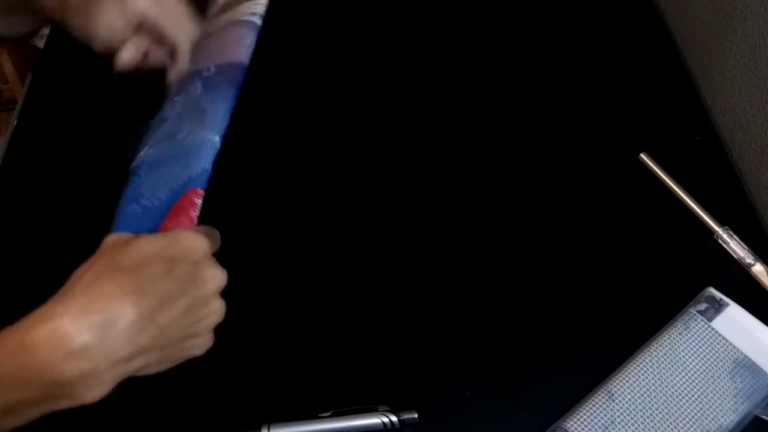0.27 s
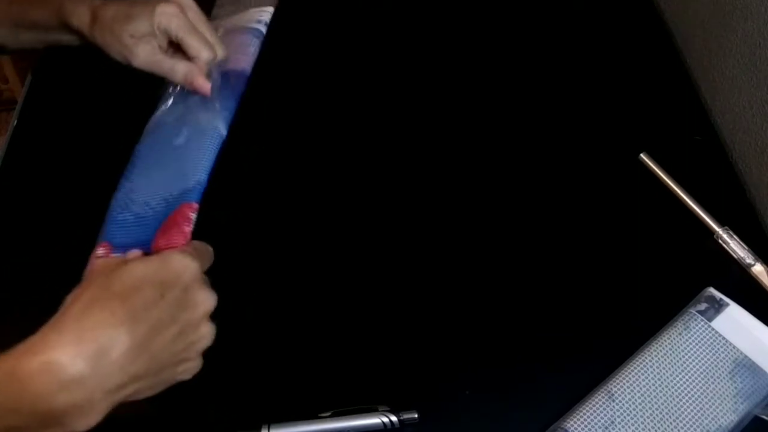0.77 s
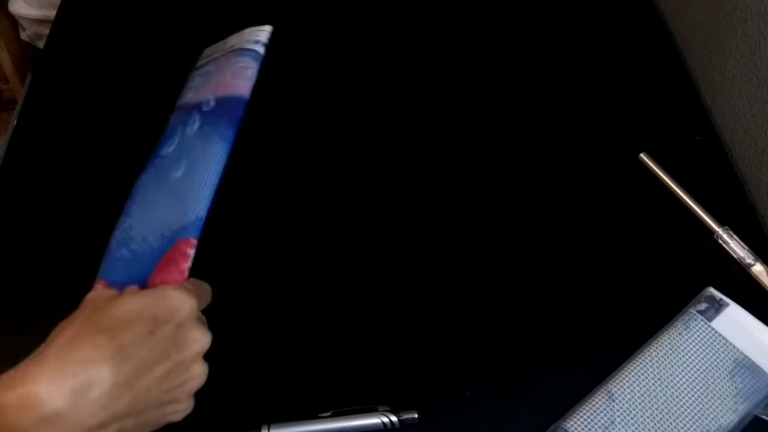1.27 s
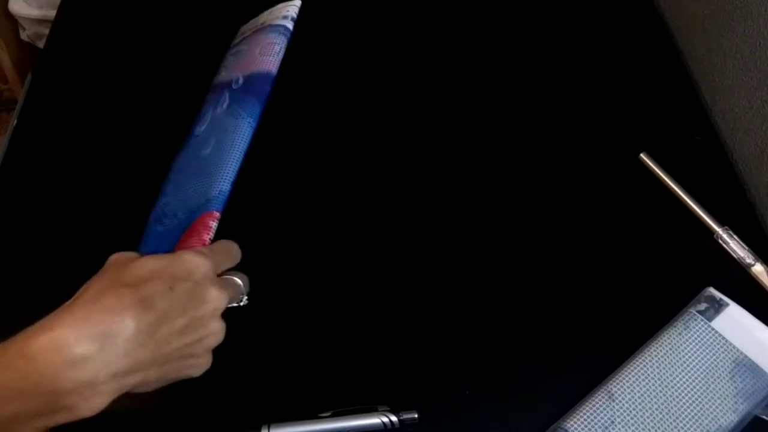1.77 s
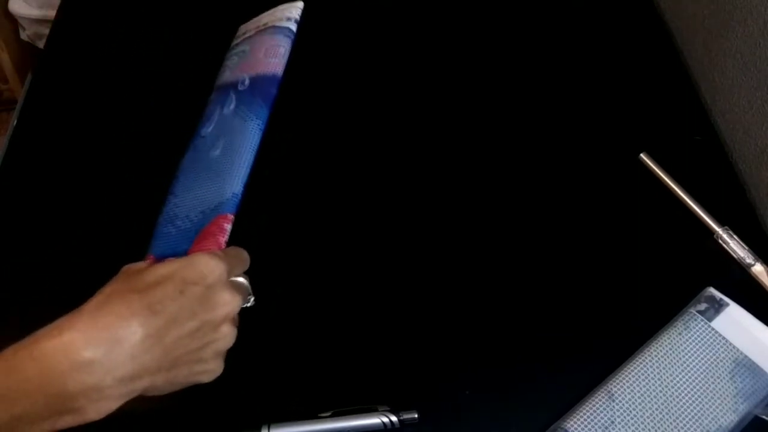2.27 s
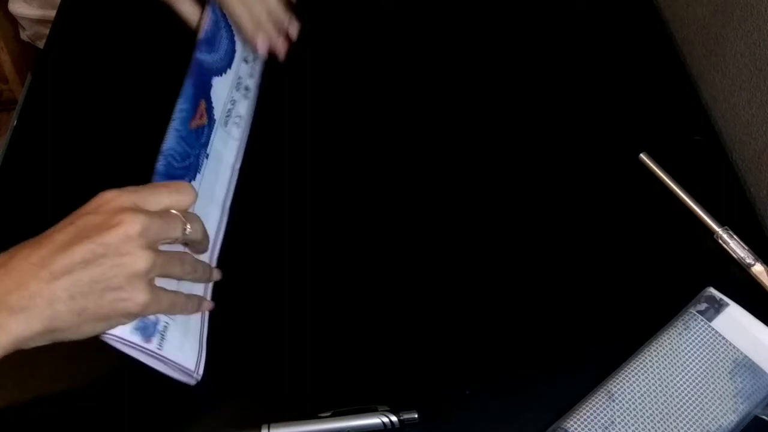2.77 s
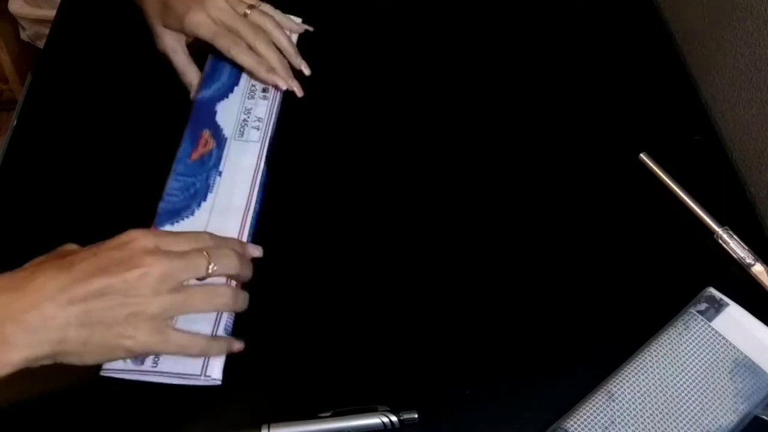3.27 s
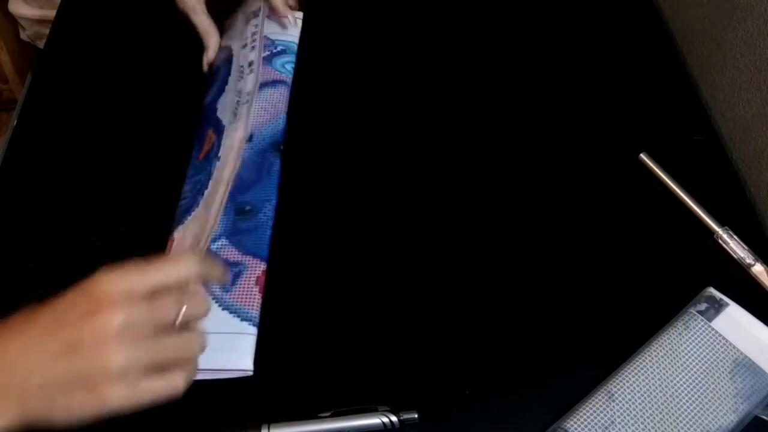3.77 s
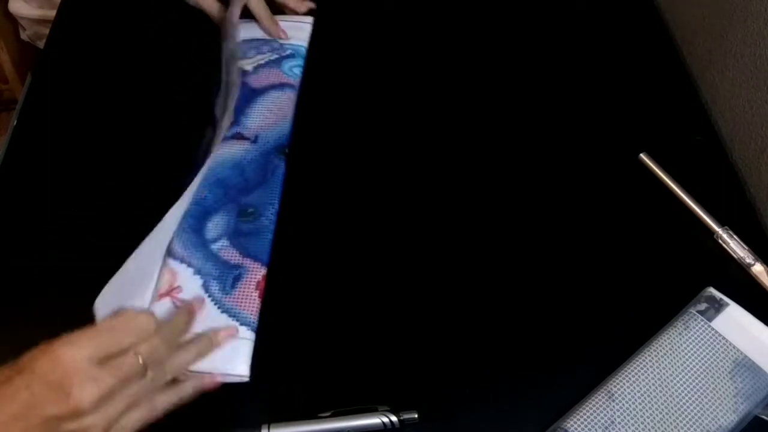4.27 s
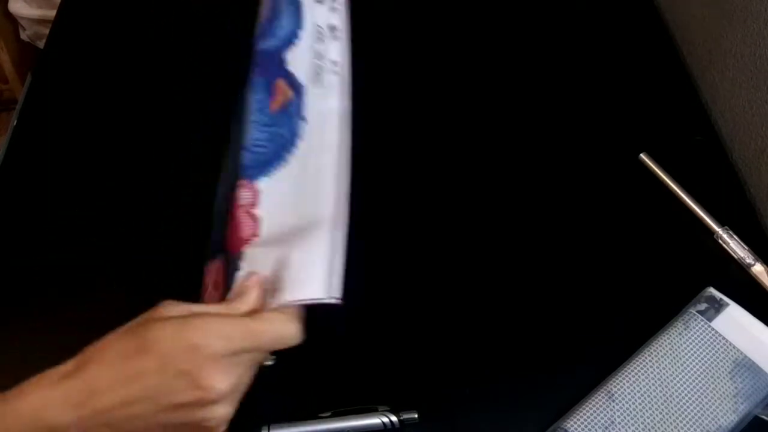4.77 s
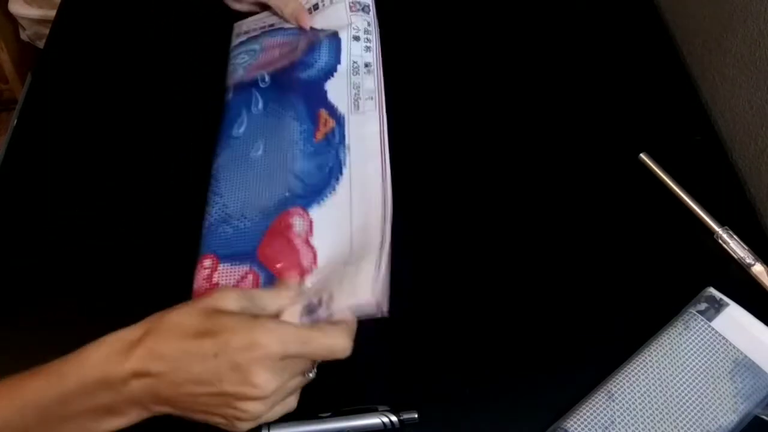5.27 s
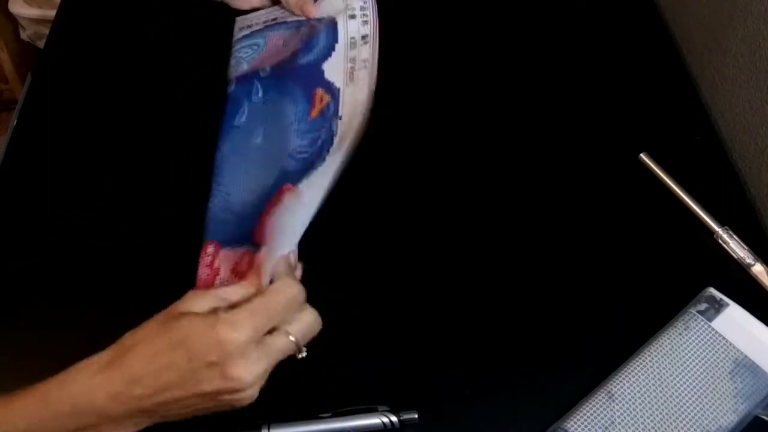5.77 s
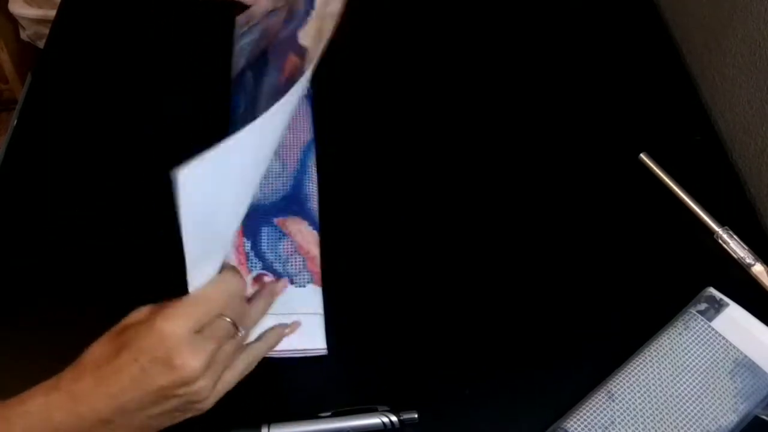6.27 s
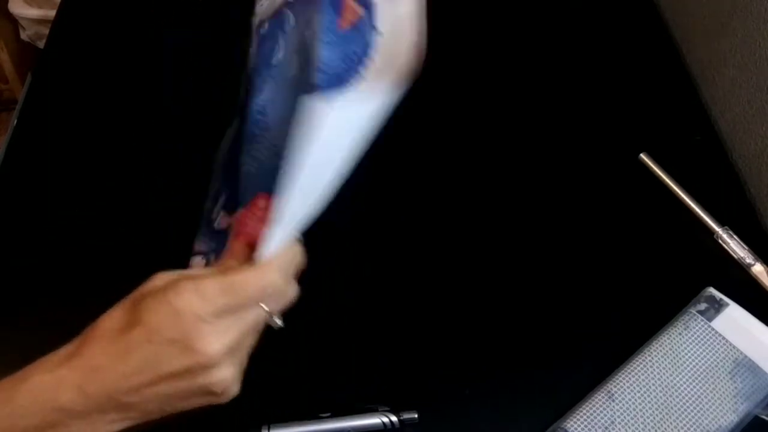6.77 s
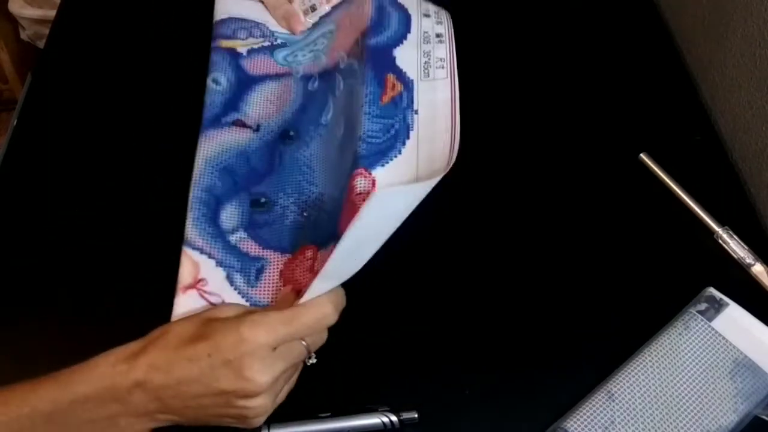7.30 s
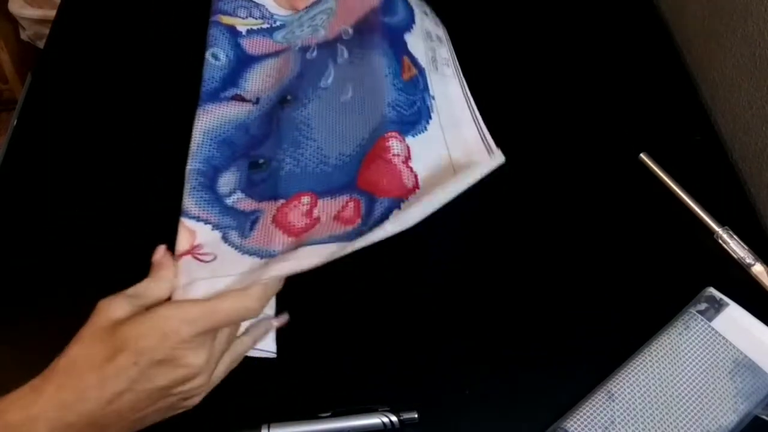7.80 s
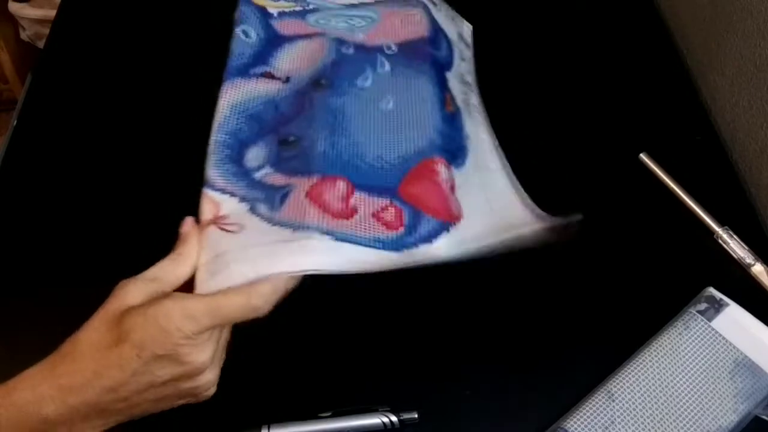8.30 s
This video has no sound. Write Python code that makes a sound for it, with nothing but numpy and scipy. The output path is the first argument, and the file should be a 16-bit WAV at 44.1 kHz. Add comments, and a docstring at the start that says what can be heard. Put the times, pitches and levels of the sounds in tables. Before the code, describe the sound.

Close stereo microphones in a small quiet room catch hands handling a tightly rolled coated canvas on a wooden desk. Sparse film crackles and small snaps come first, then a quieter stretch. A hard slap and desk knock just past four seconds begins the unrolling, with brighter clicks, flapping rustles, several bumps around six seconds, a sharp slap at seven, and a growing crinkle to the end.

```python
"""A soft slap and a faint rustle open a run of crackles, snaps and knocks over quiet room tone:
hands unroll a stiff coated canvas on a wooden desk in a small room, close to two microphones.
Film, sheet and fingertips are noise driven by random slips; creases snap, and blows ring the desk's modes.
The hollow roll hums on one note when bumped or dragged. The left microphone is duller, inverted,
a little late and carries an offset."""
import sys
import numpy as np
from scipy import signal
from scipy.fft import rfft, irfft, next_fast_len
from scipy.io import wavfile

SR = 44100
rng = np.random.default_rng(int(sys.argv[2]) if len(sys.argv) > 2 else 0)


def transcribe(u):
    """Save the signal u as a 16-bit wav file named by the first command-line argument.

    u: samples, shape (n,) or (channels, n), limited to [-1, 1]; the rate is SR.
    q: integer samples, one column per channel.
    """
    v = np.clip(np.atleast_2d(u).T, -1, 1)
    q = np.round(v * 32767).astype(np.int16)
    wavfile.write(sys.argv[1], SR, q)


N = 376613  # length in samples

# Room tone spectrum. Each row: frequency in Hz, density in dB per Hz.
ROOM_TONE = [(30, -94), (75, -83), (150, -82.5), (350, -90), (1200, -101.5), (3000, -104), (7000, -114),
             (15000, -115)]
# Reverberation. Each row: band centre in Hz, time to fall 60 dB in seconds.
ROOM_DECAY = [(300, 0.25), (1500, 0.12), (8000, 0.24)]
# Bumps and drags of the hollow roll. Each row: start in seconds, peak in dB, contact decay in seconds.
ROLL_BUMPS = [(3.389, -42.5, 0.021), (3.872, -52.5, 0.017), (3.956, -49.5, 0.11), (4.15, -47, 0.037),
              (7.024, -43, .01)]
# Modes of the desk top. Each row: frequency in Hz, relative level in dB, time to fall 60 dB in seconds.
DESK_MODES = [(82.6, -26.5, 0.66), (139.7, 0, 0.27), (203, -11.5, 0.2), (269.4, -15, 0.19),
              (442, -1, 0.025), (644.5, -17, 0.076)]
# Sheet slaps and bumps of the roll. Each row: start in seconds, slap peak in dB, slap centre in Hz,
# desk peak in dB, hardness in dB per octave, contact time in seconds.
CONTACTS = [(.027, -40, 617, -63, 14, 0.017), (0.3403, -32, 624, -73, -11, 0.015),
            (1.254, -40, 284, -41.5, -6, 0.024), (2.217, -40, 274, -62, 18, 0.017),
            (3.3885, -40, 318, -34, 1, 0.0099), (4.27, -24, 1960, -28, 10.5, 0.0069),
            (4.279, -16.5, 610, -20, -4.5, 0.012), (4.9574, -31, 775, -59, -8, 0.0022),
            (5.263, -37.5, 637, -74, -5, 0.045), (5.299, -31, 716, -33, 9.5, 0.014),
            (5.7481, -31, 1260, -59, -15, 0.0058), (6.041, -33, 1010, -72, 0, 0.022),
            (6.112, -43, 375, -41, 8.5, 0.017), (6.183, -39, 480, -38, 0, 0.015),
            (6.196, -24, 385, -25.5, 2, 0.013), (6.297, -25.5, 1800, -27.5, 11, 0.018),
            (6.311, -26, 493, -23, -9, 0.023), (6.5748, -29, 617, -38, 0, 0.013),
            (6.619, -39.5, 302, -42.5, -39, 0.0083), (6.726, -37.5, 427, -51, -5, 0.0022),
            (7.021, -34.5, 626, -36.5, 3, 0.013), (7.113, -41, 1140, -68, 0, 0.0024),
            (7.2259, -18.5, 1190, -29, 9, 0.0045)]
# Resonances of the curled sheet. Each row: frequency in Hz, width in Hz, relative level in dB.
SHEET_MODES = [(302, 92, -7.5), (544, 75, -2.5), (672, 104, 2), (958, 264, -1), (1218, 318, 0.5),
               (1458, 610, -6)]
# Single creases of the film that let go. Each row: start in seconds, peak in dB.
CREASES = [(.5862, -27), (.762, -31), (.9385, -32), (.972, -28), (1.515, -32), (1.6945, -32), (1.8738, -41),
           (1.9606, -40), (2.0235, -39), (2.1425, -25), (2.952, -42), (4.017, -40), (4.36, -31),
           (4.493, -39), (4.578, -36), (4.741, -29), (4.748, -33), (5.003, -31), (5.052, -33),
           (5.1457, -34), (5.184, -32), (5.1905, -30), (5.198, -33), (5.208, -31), (5.2415, -29),
           (5.28, -33), (5.3, -30), (5.572, -34), (5.687, -32), (5.834, -33), (6.0965, -34), (6.1348, -20),
           (6.939, -30), (7.436, -33), (7.644, -35), (7.791, -34), (7.902, -33), (8.1404, -32), (8.24, -32),
           (8.314, -27), (8.352, -29)]
# Film colour. Each row: frequency in Hz, relative gain in dB.
FILM_COLOUR = [(700, 1), (3000, 0.5), (6500, -0.5), (8500, 1), (15500, -4)]
# The film is duller while the roll is tight. Each row: time in seconds, gain in dB of an added treble band.
FILM_TREBLE = [(2.3, -10), (4.3, 7.5)]
# Separate moves of the hands. Each row: peak time in seconds, swell time in seconds,
# then the peak levels in dB of film crackle, sheet rustle and fingertip slide.
HAND_MOVES = [(.30, 0.06, -57.5, -58.5, -58.5), (0.588, 0.033, -48.5, -49.5, -55),
              (.70, 0.0075, -89, -49, -52.5), (0.951, 0.066, -42, -49, -55),
              (1.031, 0.075, -49, -47.5, -54), (1.208, 0.049, -44.5, -49.5, -57),
              (1.48, 0.0093, -48, -60, -43.5), (1.518, 0.0046, -39.5, -55, -57),
              (1.694, 0.0043, -43.5, -59.5, -47), (1.80, 0.089, -53.5, -79, -61),
              (1.959, 0.0042, -63, -80, -68), (2.026, 0.0028, -49, -74, -65),
              (2.141, 0.009, -45, -52, -49.5), (2.224, 0.017, -63, -49, -52.5),
              (2.444, 0.037, -56, -51, -65), (2.85, 0.24, -61.5, -52, -81), (2.955, 0.024, -83, -46.5, -52),
              (3.178, 0.036, -70, -52.5, -56), (3.24, 0.062, -76, -57.5, -58.5),
              (3.72, 0.13, -67, -56.5, -58), (4.015, 0.23, -59.5, -57, -59.5),
              (4.298, 0.081, -54.5, -44.5, -51), (4.63, 0.066, -82, -49, -80), (5.03, 0.033, -53, -69, -78),
              (5.185, .004, -62, -53.5, -76), (5.30, 0.06, -59, -49.5, -51.5),
              (5.57, 0.072, -56.5, -60, -86), (5.688, .004, -49, -99.5, -96), (5.80, 0.08, -54, -65, -64),
              (6.11, 0.47, -58, -49.5, -59), (6.265, 0.045, -81, -43.5, -61),
              (6.298, 0.0056, -75, -41, -51), (6.729, 0.018, -50.5, -50, -47),
              (6.94, 0.034, -47.5, -58, -75), (7.025, 0.1, -54, -51, -74), (7.236, 0.046, -46.5, -41, -49),
              (7.50, 0.058, -47.5, -47.5, -50.5), (7.648, 0.015, -58, -51.5, -52),
              (7.904, 0.078, -50.5, -51, -52), (8.16, 0.14, -51.5, -60, -68), (8.32, 0.21, -53, -46, -52),
              (8.483, 0.097, -43.5, -36.5, -50.5)]
# Fall after each move, in dB per second: film, sheet, fingertips.
MOVE_FADES = (109, 160, 201)
# Faint stirring of the held roll. Each row: time in seconds, film crackle in dB, sheet rustle in dB.
STIRRING = [(0, -71, -71), (.8, -53, -63), (1.4, -65.5, -60.5), (2.57, -70.5, -65.5), (3.33, -83, -68),
            (4.5, -60.5, -61.5), (6.5, -57.5, -59.5), (8.54, -60.5, -57)]
# Response of the left microphone. Each row: frequency in Hz, gain in dB.
LEFT_RESPONSE = [(40, 9), (110, -0.5), (300, 0), (5000, -1), (8500, -5.5), (9900, -1), (11000, -7.5),
                 (15000, -7)]

HUM_HZ, HUM_WIDTH_HZ = 267, 6.9
STRIKE_SPREAD_DB, STRIKE_DETUNE = 3, .015  # standard deviations of mode level and of relative frequency
SNAP_TIGHT_HZ, SNAP_LOOSE_HZ = 8000, 13000
SNAP_WIDTH_HZ, SNAP_DECAY_S = 11000, .0008  # width of each of two filter passes
PEEL_DB, PEEL_DECAY_S, PEEL_HZ = -19, .012, 12000  # gain before the snap is scaled to its peak
SWELL_DB = 12  # rise of a move during its swell time
STIR_SLIDE_DB = -5.5  # fingertips against the mean of film and sheet in dB
DESK_LEAD_S = 0.0014  # before the lag of the left microphone
LEFT_LAG_SAMPLES, LEFT_OFFSET = 19.8, .007  # offset as a part of full scale
TOP_HZ = 15600  # upper edge of both channels


def undb(db):
    """Decibels express a ratio of amplitudes on a logarithmic scale."""
    return 10 ** (np.asarray(db) / 20)


def level(x, db):
    """Root-mean-square scaling sets the average power."""
    return x * undb(db) / np.sqrt(np.mean(x ** 2))


def peak(x, db):
    """Peak scaling sets the largest excursion."""
    return x * undb(db) / np.abs(x).max()


def colour(x, points, lag=0):
    """Linear filtering: gains joined on a log-frequency axis, and a delay in samples as a phase slope."""
    hz, db = np.transpose(points)
    size = next_fast_len(len(x) + 4096)
    f = np.maximum(np.arange(size // 2 + 1) * SR / size, 1)
    gain = undb(np.interp(np.log(f), np.log(hz), db))
    delay = np.exp(-2j * np.pi * f * lag / SR)
    return irfft(rfft(x, size) * gain * delay, size)[:len(x)]


def band(x, hz, width_hz):
    """A single resonance has unit gain at its centre; its width sets its damping."""
    return signal.lfilter(*signal.iirpeak(hz, hz / width_hz, SR), x)


def double_band(x, hz, width_hz):
    """Two equal resonances in series have steeper skirts than one."""
    return band(band(x, hz, width_hz), hz, width_hz)


def burst(decay_s):
    """An impulsive source: noise that starts at once and decays exponentially."""
    t = np.arange(SR // 8) / SR
    return rng.standard_normal(len(t)) * np.exp(-t / decay_s)


def grains(per_s, spread_db, burst_s):
    """Stick-slip friction: random slips, many small and few large, each decaying exponentially."""
    size = np.minimum(rng.exponential(size=N), 3.5)
    slip = (rng.random(N) < per_s / SR) * undb(spread_db * size)
    return signal.lfilter([1], [1, -np.exp(-1 / (burst_s * SR))], slip)


def add(out, s, sound):
    """Superposition: a sound starting at s seconds adds to what is there."""
    i = int(s * SR)
    out[i:i + len(sound)] += sound[:N - i]


def room_tone():
    """Steady background noise is a random signal with a given power spectral density."""
    unit_density = np.sqrt(SR / 2) * rng.standard_normal(N)
    return colour(unit_density, ROOM_TONE)


def tail():
    """Diffuse reverberation: noise of unit energy that decays at a separate rate in each band."""
    t = np.arange(SR // 3) / SR
    answer = np.zeros(len(t))
    for hz, t60 in ROOM_DECAY:
        noise = band(rng.standard_normal(len(t)), hz, 1.85 * hz)
        answer += noise * undb(-60 * t / t60)
    return answer / np.sqrt(np.sum(answer ** 2))


def room(x, count=3):
    """Time-varying reverberation: the sheet keeps moving, so the answer fades from one shape to the next."""
    turn = 2 * np.pi * np.arange(N) / SR
    out = np.zeros(N)
    for k in range(count):
        # the squares of all shares sum to one
        share = np.sqrt(2 / count) * np.cos(turn + np.pi * k / count)
        out += signal.oaconvolve(x * share, tail())[:N]
    return out


def hums():
    """Air-column resonance: short noise excites one low, narrow mode of the hollow roll."""
    out = np.zeros(N)
    for s, db, contact_s in ROLL_BUMPS:
        contact = np.pad(burst(contact_s), (0, SR // 4))
        add(out, s, peak(band(contact, HUM_HZ, HUM_WIDTH_HZ), db))
    return out


def desk_ring(hard_db):
    """Modal vibration: decaying sines vary with the spot struck; a harder blow favours the upper modes."""
    t = np.arange(SR // 2) / SR
    spot = rng.standard_normal((len(DESK_MODES), 2)) * (STRIKE_SPREAD_DB, STRIKE_DETUNE)
    ring = np.zeros(len(t))
    for (hz, db, t60), (spot_db, detune) in zip(DESK_MODES, spot):
        # hardness counts octaves from the second mode
        mode_db = db + spot_db + hard_db * np.log2(hz / DESK_MODES[1][0])
        ring += undb(mode_db - 60 * t / t60) * np.sin(2 * np.pi * hz * (1 + detune) * t)
    return t, ring


def slap(hz, contact_s):
    """Impact and air flow: a first touch, then air squeezed out in uneven puffs as the sheet settles."""
    air = burst(contact_s)
    puffs = np.repeat(rng.exponential(size=len(air) // 128 + 1), 128)[:len(air)]
    air *= puffs ** .5
    air[0] += 1.5 * np.sqrt(SR / hz)  # first touch
    return double_band(air, hz, 0.87 * hz)


def knocks():
    """Impact excitation: each contact slaps the sheet and, more slowly, pushes the desk top into its modes."""
    slaps, desk = np.zeros(N), np.zeros(N)
    for s, slap_db, hz, desk_db, hard_db, contact_s in CONTACTS:
        add(slaps, s, peak(slap(hz, contact_s), slap_db))
        t, ring = desk_ring(hard_db)
        # the modes swell while the contact lasts
        swell = 1 - np.exp(-(t / (0.55 * contact_s)) ** 2)
        add(desk, s, peak(ring * swell, desk_db))
    return slaps, desk


def sheet(x):
    """Resonant radiation: the curled canvas rings at its modes, neighbours in opposite polarity."""
    out = np.zeros(len(x))
    for k, (hz, width_hz, db) in enumerate(SHEET_MODES):
        out += (-1) ** k * undb(db) * band(x, hz, width_hz)
    return out


def snaps():
    """Sudden release: a crease clicks and jolts the sheet; the freed film peels on with a fading hiss."""
    clicks, jolts = np.zeros(N), np.zeros(N)
    for s, db in CREASES:
        peel = undb(PEEL_DB) * double_band(burst(PEEL_DECAY_S), PEEL_HZ, SNAP_WIDTH_HZ)
        # the click brightens as the roll loosens
        hz = np.interp(s, np.transpose(FILM_TREBLE)[0], (SNAP_TIGHT_HZ, SNAP_LOOSE_HZ))
        click = double_band(burst(SNAP_DECAY_S), hz, SNAP_WIDTH_HZ)
        add(clicks, s, peak(click + peel, db))
        jolts[int(s * SR)] = undb(db)
    return clicks + undb(14) * sheet(jolts)


def effort():
    """Power summation: the moves add as incoherent sources over the stirring, giving three gains."""
    t = np.arange(0, N, 64) / SR
    s, film_db, sheet_db = np.transpose(STIRRING)
    stir_db = [film_db, sheet_db, (film_db + sheet_db) / 2 + STIR_SLIDE_DB]
    power = np.array([undb(np.interp(t, s, db)) ** 2 for db in stir_db])
    for s, swell_s, *peak_db in HAND_MOVES:
        before_db = SWELL_DB * (s - t) / swell_s
        after_db = np.outer(MOVE_FADES, t - s)
        below_peak_db = np.where(t < s, before_db, after_db)
        power += undb(np.array(peak_db)[:, None] - below_peak_db) ** 2
    return [np.interp(np.arange(N) / SR, t, np.sqrt(p)) for p in power]


def handling():
    """Friction noise follows the hands: the same slips sound in the sheet and on the weave."""
    film_gain, sheet_gain, slide_gain = effort()
    noise = rng.standard_normal((3, N))
    slips = grains(per_s=970.0, spread_db=4.5, burst_s=0.0036)
    crackle = .25 + grains(per_s=150., spread_db=3., burst_s=.0006)
    # patches peel off at once, then ease
    crackle = crackle + .25 * grains(per_s=28., spread_db=2., burst_s=.02)
    film = colour(crackle * noise[0], FILM_COLOUR)
    treble_gain = undb(np.interp(np.arange(N) / SR, *np.transpose(FILM_TREBLE)))
    film = level(film + treble_gain * band(film, 14000, 5200), 0)
    rustle = level(sheet(slips * noise[1]), 0)
    weave = band((slips + 0.25 * crackle) * noise[2], 2200.0, 8000.0)
    slide = level(band(weave, 2490.0, 1430.0), 0)
    return film * film_gain + rustle * sheet_gain + slide * slide_gain


def scene():
    """Partial coherence: most sound is shared; some low reverberation and room tone differ by side."""
    slaps, desk = knocks()
    hands = handling()
    near = hands + snaps() + slaps
    # the working hands keep the desk murmuring
    murmur = undb(-38.0) * signal.oaconvolve(hands, desk_ring(2.54)[1])[:N]
    desk = desk + hums() + murmur
    shared = near + undb(-5) * room(near) + room_tone()
    own = np.array([band(undb(-14) * room(near) + undb(-3) * room_tone(), 200, 600) for _ in range(2)])
    # the shake of the desk reaches the left microphone first
    desk_pair = np.array([np.roll(desk, -int(DESK_LEAD_S * SR)), desk])
    return shared + own + desk_pair


def record(dry):
    """Transduction as linear filtering: left is duller, late, inverted and offset; both tops are cut."""
    left = LEFT_OFFSET - colour(dry[0], LEFT_RESPONSE, LEFT_LAG_SAMPLES)
    sos = signal.ellip(10, .2, 70, TOP_HZ, fs=SR, output="sos")
    return signal.sosfiltfilt(sos, np.array([left, dry[1]]))


dry = scene()
out = record(dry)
transcribe(out)
```